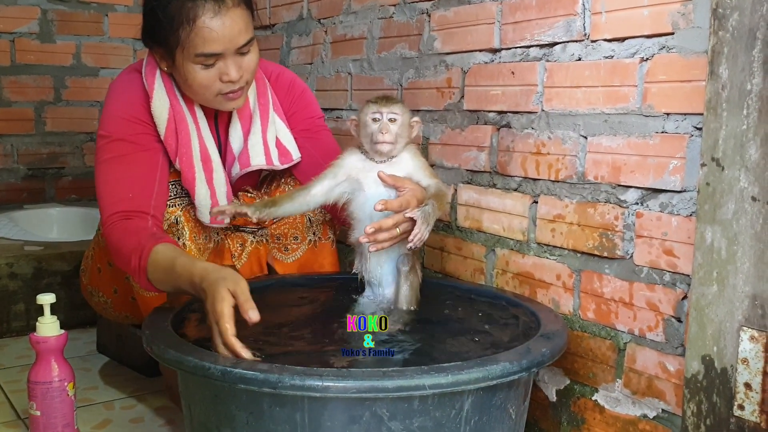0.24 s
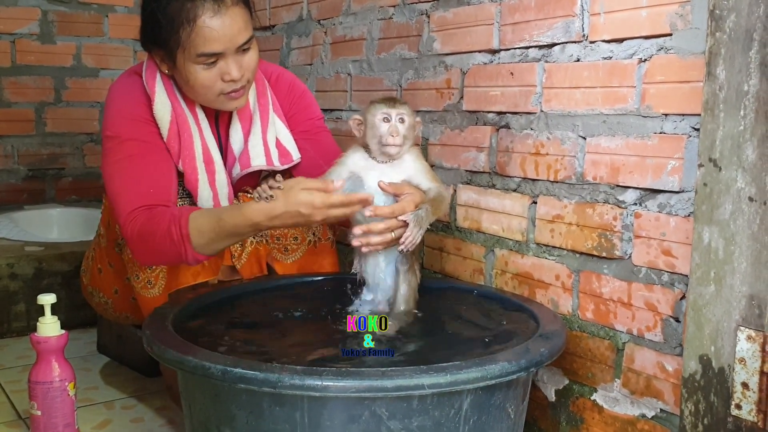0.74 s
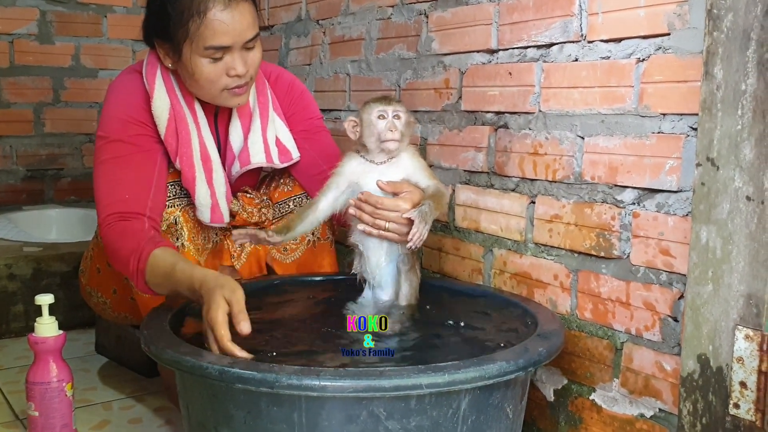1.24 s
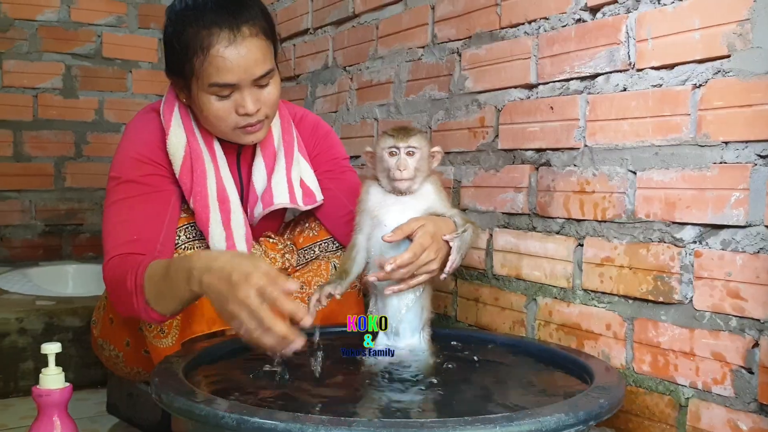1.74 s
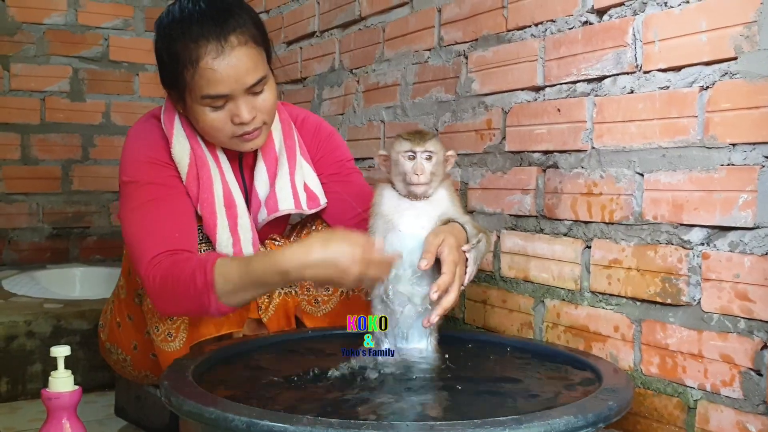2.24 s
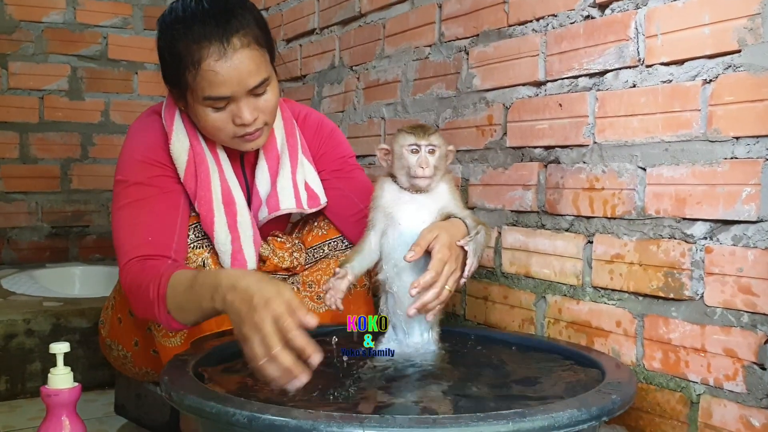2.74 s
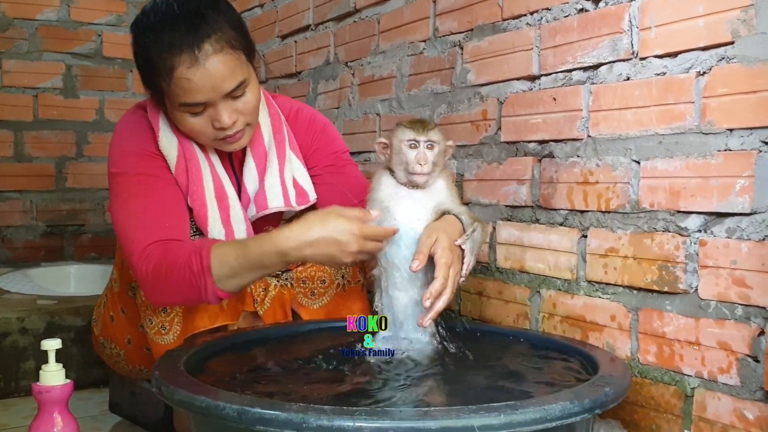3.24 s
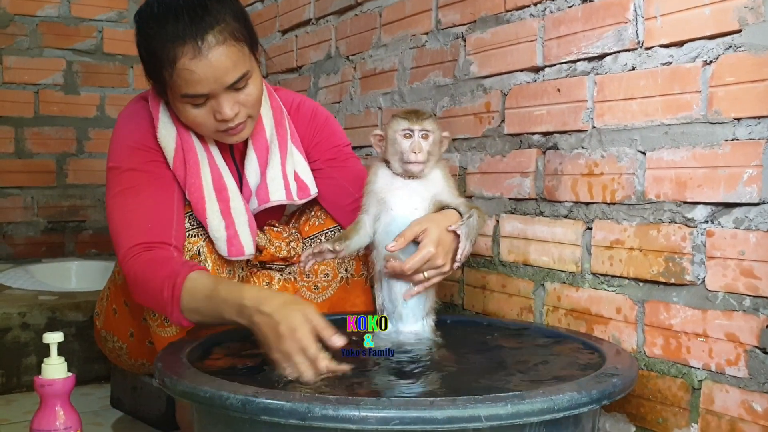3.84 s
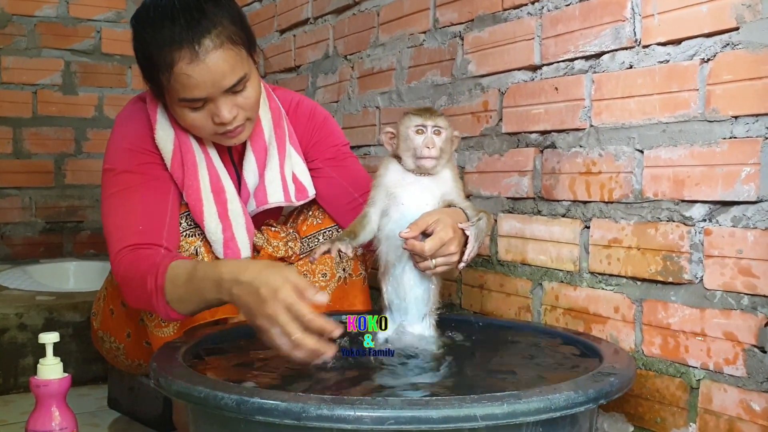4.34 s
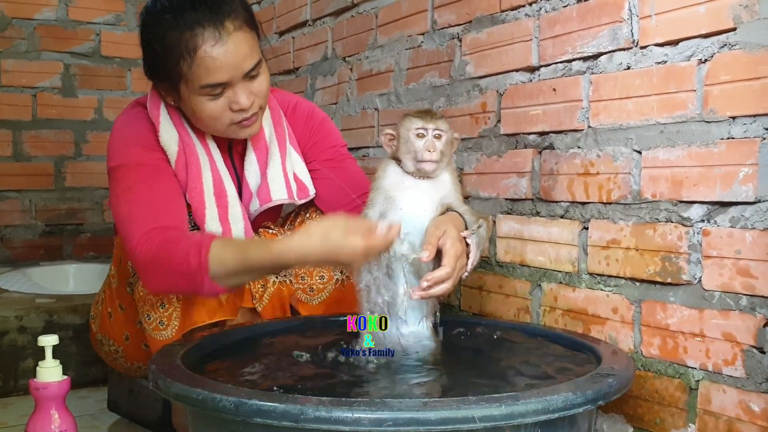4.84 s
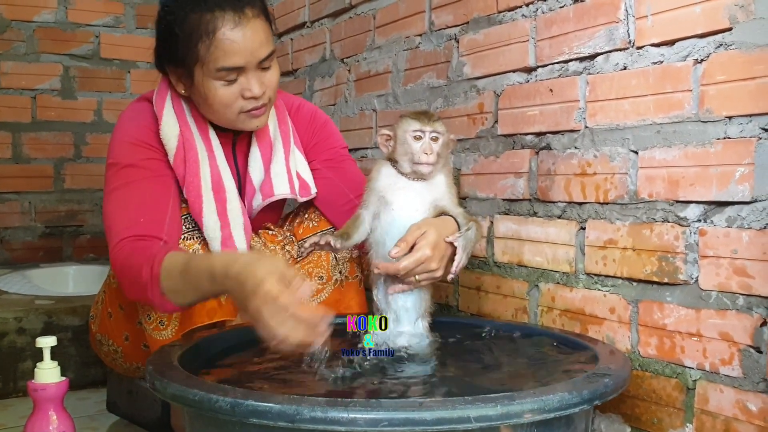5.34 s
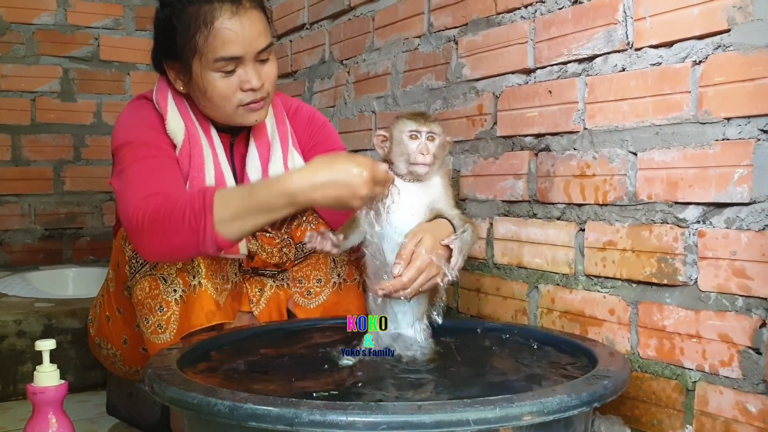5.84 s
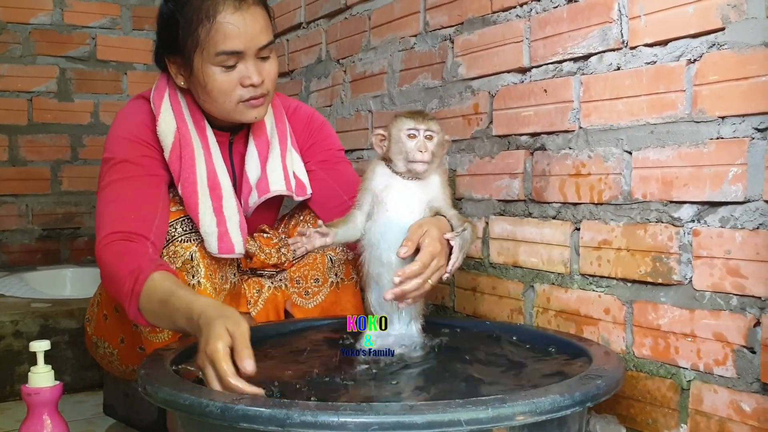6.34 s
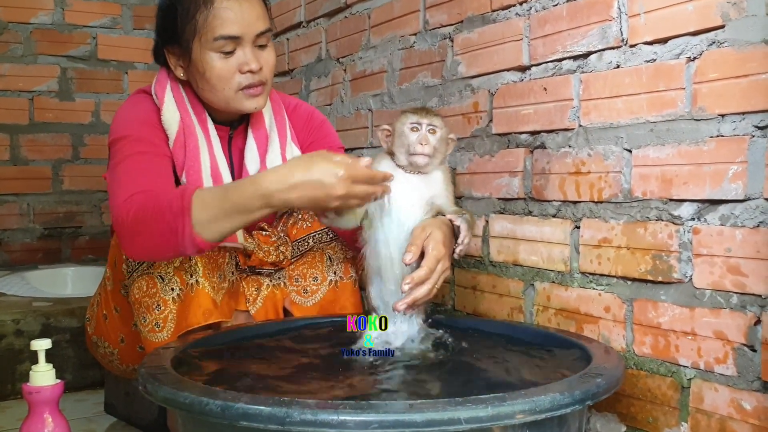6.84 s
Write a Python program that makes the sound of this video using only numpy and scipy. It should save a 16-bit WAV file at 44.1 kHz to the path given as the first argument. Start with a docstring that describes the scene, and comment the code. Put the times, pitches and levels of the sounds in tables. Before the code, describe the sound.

Close to the microphone, a hand repeatedly scoops water from a plastic tub and tosses it over a small animal. Quick wet slaps, bubbly upward swells, bright plips and clicks and tinkling run-off come irregularly, with brief lulls between. A hard brick corner adds a short, close echo. A very faint rising whistle opens it, over quiet air and low hum.

```python
"""A brick corner with a plastic tub close to the microphone: a hand scoops water over a small animal, repeatedly.
Scoops are swells of ringing bubbles; slaps are dense bursts of shorter ones; run-off is a random swarm
of bubbles, drops and fine spray. Single drops plip and click, and larger air pockets ring on.
The walls answer with decaying noise echoes. A faint rising whistle opens the scene; quiet air (noise),
low hums and drones (wavering sines) and rumble (dull noise) lie behind."""
import sys
import numpy as np
from scipy import signal
from scipy.fft import rfft, irfft, next_fast_len
from scipy.io import wavfile
from scipy.ndimage import map_coordinates

SR = 44100
rng = np.random.default_rng(int(sys.argv[2]) if len(sys.argv) > 2 else 0)


def bounce(signal):
    """Save signal as a 16-bit WAV file at the path given by the first command-line argument."""
    frames = np.transpose(np.atleast_2d(signal))
    limited = np.clip(frames, -1, 1)
    pcm = np.round(limited * 32767).astype(np.int16)
    wavfile.write(sys.argv[1], SR, pcm)


N = 313154  # length in samples

# Levels in the tables are settings before each layer's own trim; positive pan leans left.
# tone of the quiet air: [f/Hz, relative level/dB]
AIR_TONE = [(88, -55), (150, -5), (354, -15), (1560, -12.5), (2400, -9), (3220, -11), (3550, -17),
            (5680, -10), (8070, -16), (11300, -10), (14000, -17.5), (16000, -27)]
# tone of the rumble: [f/Hz, relative level/dB]
RUMBLE_TONE = [(20, -31), (32, -22), (42, -16), (60, 2.5), (82, -8.5), (112, -1), (150, -13.5), (200, -22),
               (400, -25), (1000, -54.5)]
# likeness of the two background channels: [f/Hz, correlation]
CHANNEL_LIKENESS = [(60, 0.82), (150, 0.87), (400, 0.72), (2000, 0.1), (10000, 0.097)]
# low wavering hum: [f/Hz, level/dB rms before its waver]
HUMS = [(61.5, -77), (114, -82)]
# dull low swells as the tub is jostled: [crest t/s, width/s, level/dB]
TUB_SWELLS = [(1.24, 0.094, -65.5), (2.418, 0.083, -66), (2.72, 0.11, -65.5), (3.95, 0.27, -62),
              (4.78, 0.066, -69.5), (5.11, 0.03, -58.5), (6.1, 0.4, -68), (7.03, 0.31, -65.5)]
# faint low drones: [t/s, length/s, f/Hz, held level/dB rms]
DRONE_TONES = [(0, 1.04, 169.3, -78.5), (2.38, 1.18, 231, -82.5), (5.294, 0.95, 117.4, -73.5)]
# decay of the tail between the brick walls: [f/Hz, t60/s]
WALL_DECAY = [(200, 0.61), (600, 0.29), (1000, 0.32), (3000, 0.28), (8000, 0.32), (15000, 0.26)]
# water spilling from the hand or off the animal into the tub:
# [t/s, length/s, gurgle level/dB, tinkle level/dB, patter level/dB, spray level/dB]
SPILL_EVENTS = [(0, 0.015, -62, -62.5, -57, -68), (0.2, 0.039, -50.5, -44.5, -47, -54),
                (0.466, 0.094, -54.5, -45, -48.5, -57), (0.639, 0.11, -76, -52, -49.5, -55),
                (0.877, 0.088, -48, -45, -43, -54), (1.449, 0.12, -68.5, -58.5, -59, -78),
                (1.608, 0.18, -70.5, -49, -53.5, -58.5), (1.848, 0.09, -69.5, -54, -51, -54.5),
                (2.04, 0.23, -78, -73, -67.5, -62), (2.334, 0.15, -93, -60, -59, -57),
                (2.554, 0.072, -54.5, -54.5, -52, -47), (2.973, 0.054, -95, -68.5, -64, -70),
                (3.06, 0.045, -55.5, -43, -51.5, -58), (3.214, 0.087, -71.5, -54.5, -51.5, -53),
                (3.446, 0.049, -57.5, -51.5, -54, -56), (4.005, 0.19, -56.5, -48, -50.5, -52.5),
                (4.268, 0.1, -61.5, -46.5, -49, -49), (4.495, 0.075, -96, -72.5, -78, -75),
                (4.59, 0.08, -73.5, -68, -63.5, -56.5), (4.7, 0.12, -61.5, -63.5, -61, -60.5),
                (4.82, 0.064, -64.5, -50, -51, -55), (4.982, 0.18, -60.5, -53, -46, -51),
                (5.214, 0.2, -70, -52.5, -55.5, -52.5), (5.671, 0.29, -59, -54, -60, -55.5),
                (5.95, 0.086, -59.5, -52, -51, -42.5), (6.132, 0.1, -65.5, -49.5, -49, -43.5),
                (6.494, 0.21, -78, -64, -63.5, -67.5), (6.758, 0.17, -69.5, -49.5, -51.5, -47),
                (7.009, 0.063, -54, -46.5, -43.5, -42.5)]
# release of a spill, small drops falling longest: [gurgle, tinkle, patter, spray time/s per 60 dB]
SPILL_RELEASE = [0.12, 0.16, 0.25, 0.3]
# the hand ploughs through the water and its bubbles shrink:
# [t/s, length/s, bubble level/dB, first f/Hz, last f/Hz]
SCOOP_EVENTS = [(0.403, 0.074, -39, 1163, 1880), (1.423, 0.11, -50.5, 1230, 1740),
                (2.102, 0.13, -41, 1520, 2950), (3.024, 0.081, -46, 1300, 2030),
                (3.84, 0.12, -61.5, 546, 1160), (3.942, 0.11, -41, 1246, 1690),
                (4.673, 0.07, -39.5, 1245, 1664), (4.972, 0.078, -49, 883, 1180),
                (5.596, 0.089, -55.5, 666, 1380), (5.73, 0.25, -64, 1700, 2700),
                (6.495, 0.094, -44.5, 793, 1470), (6.922, 0.16, -54, 553, 727)]
# large bubbles that ring on: [t/s, level/dB, f/Hz, t60/s]
GLUG_EVENTS = [(0.765, -44.5, 918, 0.082), (1.507, -26, 1220, 0.034), (2.597, -33, 659, 0.082),
               (4.175, -41, 972, 0.12), (6.535, -35.5, 896, 0.1)]
# drops that trap a small bubble: [t/s, level/dB, f/Hz, pan/dB]
PLIP_EVENTS = [(0.4281, -28.5, 2100, -6), (0.6668, -23, 3480, -1.5), (0.708, -30.5, 2516, -18.5),
               (0.7126, -31, 2740, 35), (0.8827, -19, 2176, -9), (0.9491, -29, 2140, -11),
               (1.461, -30.5, 1560, 5), (1.5792, -26.5, 5040, -3), (1.6596, -28, 3080, -4),
               (1.679, -28.5, 2440, -7), (1.727, -23.5, 4480, 0), (1.7897, -33, 1595, 3),
               (1.8562, -18, 6500, 0), (2.0192, -26, 7440, 7), (2.063, -37.5, 5370, -5),
               (2.157, -32, 3010, -4.5), (2.178, -30, 2310, -4), (2.2164, -38, 5120, -8),
               (2.362, -27, 2280, -7), (2.4348, -35, 2530, -11), (2.4396, -24.5, 3040, -4),
               (2.5677, -17, 5400, -2), (2.6694, -31, 2960, -6.5), (2.8607, -42.5, 3860, -3),
               (3.2066, -32.5, 1694, 1), (3.2962, -29.5, 2273, -4), (4.0128, -28, 1340, 0),
               (4.0546, -26, 2820, -2), (4.1884, -17.5, 5760, -1), (4.2622, -30, 3050, -8),
               (4.337, -33.5, 1256, 2), (4.473, -31.5, 6300, 2), (4.7194, -25.5, 5450, -3.5),
               (4.8082, -32, 2050, -3), (4.985, -26, 3740, 5), (5.1055, -27, 4870, -3),
               (5.1228, -30.5, 2450, -8.5), (5.224, -26.5, 3050, -4), (5.18, -37.5, 1053, -1),
               (5.24, -21, 4950, -4), (5.248, -36.5, 1350, -2), (5.3664, -28.5, 5800, -4),
               (5.7555, -31, 2610, -10.5), (5.778, -37, 1260, 3), (5.851, -38, 1540, 2),
               (5.9888, -28.5, 2980, -15), (6.095, -43, 1280, -18), (6.145, -26, 3740, -4),
               (6.1709, -30, 2015, 0), (6.2329, -22, 2670, -6.5), (6.234, -26, 2000, -6.5),
               (6.281, -36.5, 2860, -13), (6.2982, -33, 2940, -11), (6.3402, -37.5, 1776, -12.5),
               (6.799, -25, 2670, -7.5), (6.867, -34.5, 1086, 9)]
# drops that smack the surface or the rim: [t/s, level/dB]
TICK_EVENTS = [(0.7672, -34), (0.8145, -31), (0.8774, -25), (1.2994, -47), (1.6197, -22), (2.3025, -37),
               (2.3625, -14.5), (3.0999, -30), (3.2405, -25), (3.9509, -38), (4.1854, -31), (4.3146, -25),
               (4.4423, -31), (4.5002, -24), (4.6603, -26), (4.8419, -27), (4.9811, -21), (5.0554, -24),
               (5.2086, -26), (5.3308, -22), (5.4415, -32), (5.684, -23), (5.8426, -33), (5.9584, -24),
               (6.0931, -14), (6.1499, -24), (6.1684, -19.5), (6.1833, -21), (6.335, -30), (6.9187, -28),
               (7.0075, -22), (7.0718, -24)]
# handfuls that land: [t/s, level/dB, body level/dB re level, spray level/dB re level, t60/s]
SLAP_EVENTS = [(0.2, -39.5, 6, -23, 0.33), (0.214, -25.5, -33, -23.5, 0.047),
               (0.472, -28.5, 0.5, -19, 0.076), (0.482, -20.5, 5, -49, 0.026), (0.884, -23, -5, -18, 0.041),
               (0.899, -62, -16, -17, 0.098), (0.951, -19.5, -14, -18.5, 0.022),
               (2.564, -38, -19, -31, 0.14), (3.068, -39, -20, -56, 0.6), (3.241, -23.5, -28, -25, 0.017),
               (3.467, -24.5, -15.5, -20.5, 0.095), (4.316, -19, -38, -22, 0.06),
               (4.811, -44, -4, -40, 0.19), (5.054, -23.5, -35, -17.5, 0.04),
               (5.956, -19, -17.5, -21, 0.075), (6.964, -21.5, -36, -21.5, 0.041),
               (7.01, -12.5, -22, -37.5, 0.022)]
# filters that shade the bubble swarms, each: [f/Hz, relative gain/dB]
GURGLE_TONE = [(200, -1.5), (400, -21.5), (600, -8), (950, 5.5), (1350, 10), (1700, 12), (2600, -63)]
TINKLE_TONE = [(1000, -9), (1400, -8.5), (1800, 2), (2300, 8), (2900, 10.5), (3400, 15), (4200, -36)]
PATTER_TONE = [(2600, -28), (3500, -6), (4300, -0.5), (5600, 3.5), (7000, 0), (9000, 4), (12000, -10)]
SPRAY_TONE = [(4000, -16), (7000, -10.5), (8500, -22.5), (10000, -5.5), (11400, -2), (13000, -5.5),
              (15800, -16.5)]
SPLASH_TONE = [(700, -35), (1100, -20.5), (1800, -18), (2400, 12), (3500, 19), (5600, 16.5), (7500, 20.5),
               (11000, 8)]
# hollows in the microphone's response: [centre f/Hz, width/Hz, level/dB]
MIC_HOLLOWS = [(3303, 255, -6.5), (8240, 700, -4)]

MIC_TOP_HZ = 16100
PORT_LAG = 2.77  # typical lag of the right port behind the left, samples
RUMBLE_DB = -76  # steady rumble of the surroundings
HUM_WAVER_DB = 4
WHISTLE_S, WHISTLE_LENGTH_S = 0.025, 0.22
WHISTLE_DB, WHISTLE_FADE_DB_PER_S = -61.5, 39  # level at the start, then its fade
WHISTLE_HZ, WHISTLE_HZ_PER_S = 1540, 580
SPILL_LEAD = 0.96  # swell before a spill: time per 60 dB, as a share of its length
SPILL_SAG_DB_PER_S = 4.5  # the flow weakens as the water runs out
CLUMP_DB, CLUMPS_PER_S = 1.0, 40  # water falls in uneven clumps
TRICKLE_DB = -74.5  # fine spray that never quite stops
SCOOP_CYCLES, SCOOP_OCTAVES = 23.9, 1.466  # mean t60 in cycles; full scatter of pitch


def amp(db):
    """Decibels to gain."""
    return 10 ** (np.asarray(db) / 20)


def unit(x):
    """Scaled to rms 1."""
    return x / np.sqrt(np.mean(x ** 2) + 1e-20)


def decay(age, t60):
    """Exponential fall of 60 dB in t60."""
    return np.exp(-np.log(1000) * age / t60)


def along(points, hz):
    """Values at f/Hz, read between points on a log axis."""
    f, value = np.transpose(points)
    return np.interp(np.log(hz + 1), np.log(f + 1), value)


def wobble(rate):
    """A smooth random curve, rate knots a second."""
    knots = rng.standard_normal(int(N * rate / SR) + 4)
    return map_coordinates(knots, [np.arange(N) * rate / SR])


def filtered(x, response):
    """x times a response of frequency."""
    m = next_fast_len(N + SR // 4)
    hz = np.fft.rfftfreq(m, 1 / SR)
    return irfft(rfft(x, m) * response(hz), m)[..., :N]


def coloured(x, tone):
    """x shaded by a tone table, at rms 1."""
    return unit(filtered(x, lambda hz: amp(along(tone, hz))))


def gate(s, length, attack_s, release_s):
    """Rises from s, holds until s + length, then dies by 60 dB in release_s."""
    age = np.arange(N) / SR - s
    return np.clip(age / attack_s, 0, 1) * amp(-60 * np.maximum(age - length, 0) / release_s)


def background():
    """Quiet air, an uneven rumble and a wavering low hum, slightly stronger on the right."""
    def noise(tone):
        """Stereo noise, most alike between channels in the bass."""
        def mid_side(hz):
            # mid and side shares that give the wanted correlation
            angle = np.arccos(np.clip(along(CHANNEL_LIKENESS, hz), -1, 1)) / 2
            return np.array([np.cos(angle), np.sin(angle)])

        mid, side = filtered(rng.standard_normal((2, N)), mid_side)
        return coloured(np.array([mid + side, mid - side]), tone)

    t = np.arange(N) / SR
    swell = sum(amp(db) * np.exp(-((t - s) / width) ** 2) for s, width, db in TUB_SWELLS)
    steady = amp(RUMBLE_DB + 0.5 * wobble(2.9))
    rumble = np.hypot(steady, swell) * noise(RUMBLE_TONE)
    hum = np.zeros(N)
    for hz, db in HUMS:
        level = amp(db + HUM_WAVER_DB * wobble(7.2))
        hum += level * unit(np.sin(2 * np.pi * hz * t + wobble(31)))
    return (amp(-68) * noise(AIR_TONE) + rumble + hum) * amp([[-1.2], [1.2]])


def drones():
    """Low sines with wavering phase that fade in and out."""
    t, out = np.arange(N) / SR, np.zeros(N)
    for s, length, hz, db in DRONE_TONES:
        tone = unit(np.sin(2 * np.pi * hz * t + 0.24 * wobble(18)))
        out += amp(db) * gate(s, length, attack_s=0.15, release_s=1.0) * tone
    return out


def whistle():
    """A short thin tone, unsteady in pitch, that creeps upward as it fades."""
    age = np.maximum(np.arange(N) / SR - WHISTLE_S, 0)
    pitch = (WHISTLE_HZ + WHISTLE_HZ_PER_S * age) * (1 + 0.017 * wobble(150))
    level = amp(WHISTLE_DB - WHISTLE_FADE_DB_PER_S * age + 3.2 * wobble(67))
    tone = np.sin(2 * np.pi * np.cumsum(pitch) / SR)
    return level * gate(WHISTLE_S, WHISTLE_LENGTH_S, attack_s=0.012, release_s=0.1) * tone


def walls(x, near_db, tail_db, count=36):
    """Close brick walls return echoes and a short tail; the pattern changes gradually, so no pitch rings out."""
    hz, t, z = signal.stft(rng.standard_normal((count, 2, SR // 3)), SR, nperseg=256)
    late = amp(tail_db) * decay(t, along(WALL_DECAY, hz)[:, None])
    early = amp(near_db) * np.exp(-t / 0.0048)
    onset = 1 - np.exp(-t / 0.00056)
    answers = signal.istft(z * (early + late) * onset, SR, nperseg=256)[1]
    x = x + 0.11 * x[::-1]  # echoes also cross sides
    hop = N // (count - 1) + 1
    padded = np.pad(x, ((0, 0), (hop, 2 * hop)))
    out = np.zeros((2, N + 2 * SR))
    # overlapping windows pass from one echo pattern to the next
    for k, answer in enumerate(answers):
        piece = padded[:, k * hop:(k + 2) * hop] * signal.windows.cosine(2 * hop)
        echo = signal.fftconvolve(piece, answer, axes=1)
        out[:, k * hop:k * hop + echo.shape[1]] += echo
    return out[:, hop:hop + N]


def bubbles(s, hz, db, t60, pan_db, rise, onset_cycles):
    """Damped sines at two microphone ports; a positive rise lifts the pitch as a bubble nears the surface."""
    length = np.ceil(t60 * SR).astype(int) + 8
    who = np.repeat(np.arange(len(s)), length)  # bubble that owns each sample
    step = np.arange(len(who)) - np.repeat(np.cumsum(length) - length, length)
    at = np.clip(np.round(s * SR).astype(int), 0, N)[who] + step
    lag = np.abs(rng.normal(PORT_LAG, 1.0, len(s)))
    out = []
    # left, then right: share of the pan and delay in samples
    for side, delay in ((0.43, 0.078), (-1.7, lag[who])):
        t = np.maximum(step - delay, 0) / SR
        age = np.float32(t / t60[who])
        turns = np.float32(t * hz[who])
        swell = 1 - np.exp(-turns / onset_cycles)
        ring = np.sin(2 * np.pi * turns * (1 + rise * age)) * swell * decay(age, 1)
        level = amp(db + side * pan_db / 2)[who]
        out.append(np.bincount(at, ring * level, N)[:N])
    return np.array(out)


def swarm(tone, low_hz, high_hz, cycles, spread_db, pan_db, count):
    """Countless bubbles of random time, size, strength and place, at rms 1."""
    when, size, strength, life, place = rng.random((count, 5)).T
    hz = low_hz * (high_hz / low_hz) ** size
    db = -spread_db * np.log(strength + 0.028)  # a few stand out
    t60 = cycles * 2 ** (2 * life - 1) / hz
    pan = pan_db + 10 * (place - .5)
    cloud = bubbles(when * N / SR, hz, db, t60, pan, rise=0.11, onset_cycles=cycles / 12)
    return coloured(cloud, tone)


def spill_flow():
    """Strength of gurgle, tinkle, patter and spray: each spill swells, sags and dies away in clumps."""
    t, flow = np.arange(N) / SR, np.zeros((4, N))
    release_s = np.array(SPILL_RELEASE)[:, None]
    for s, length, *levels_db in SPILL_EVENTS:
        near = (t > s - length) & (t < s + length + .5)
        age = t[near] - s
        swell_db = 60 * np.minimum(age, 0) / (SPILL_LEAD * length)
        sag_db = -SPILL_SAG_DB_PER_S * (age - length / 2)
        release_db = -60 * np.maximum(age - length, 0) / release_s
        level = amp(np.array(levels_db)[:, None] + swell_db + sag_db + release_db)
        flow[:, near] = np.hypot(flow[:, near], level)
    shared = wobble(CLUMPS_PER_S)
    return [layer * amp(CLUMP_DB * (shared + wobble(CLUMPS_PER_S))) for layer in flow]


def spills():
    """Large bubbles gurgle under falling water, smaller ones tinkle in run-off, drops patter, spray fizzes."""
    gurgle_flow, tinkle_flow, patter_flow, spray_flow = spill_flow()
    gurgle = swarm(GURGLE_TONE, 343.3, 1703, cycles=16.4, spread_db=6.0, pan_db=2.0, count=3800)
    tinkle = swarm(TINKLE_TONE, 1370, 3350, cycles=23.0, spread_db=4.0, pan_db=-7, count=5000)
    patter = swarm(PATTER_TONE, 3326, 8630, cycles=25.0, spread_db=5.5, pan_db=-1.0, count=10000)
    spray = swarm(SPRAY_TONE, 7030, 16040, cycles=23.0, spread_db=6.5, pan_db=-4.0, count=22000)
    out = gurgle_flow * gurgle + tinkle_flow * tinkle + patter_flow * patter
    return out + (spray_flow + amp(TRICKLE_DB)) * spray


def plips():
    """Single drops: a tiny impact, then a brief ringing bubble beside a larger and a smaller one."""
    s, db, hz, pan_db = np.transpose(PLIP_EVENTS)
    out = bubbles(s, hz, db + 4.0, 30 / hz, pan_db, rise=0.034, onset_cycles=2.43)
    out += bubbles(s, 2 * hz, db - 12.5, 3 / hz, pan_db, rise=0, onset_cycles=0.37)  # impact
    for side in (-1, 1):  # larger, then smaller neighbour
        late, size = rng.random((len(s), 2)).T
        other_hz = hz * 2 ** (side * (0.17 + 0.19 * size))
        out += bubbles(s + .004 * late, other_hz, db - 10.0, 22 / other_hz, pan_db, rise=0.19, onset_cycles=1)
    return out


def ticks(count=12):
    """A smacking drop gives one sharp click and shatters into a few weaker ones."""
    s, db = np.repeat(TICK_EVENTS, count, axis=0).T
    late, size = rng.random((len(s), 2)).T
    rank = np.tile(np.arange(count), len(TICK_EVENTS)) / count
    hz = 11000 * 2 ** ((size - .5) * (0.068 + 1.2 * rank))
    db = db + 8.5 - 16 * np.sqrt(rank)
    when = s + 0.0027 * rank * (.5 + late)
    return bubbles(when, hz, db, 12 / hz, pan_db=-4.0, rise=0.051, onset_cycles=1.0)


def glugs():
    """Air pockets left by the hand ring low and long; a smaller pocket beside each roughens the ring."""
    s, db, hz, t60 = np.transpose(GLUG_EVENTS)
    pocket = bubbles(s, hz, db - 1.0, t60, pan_db=-5.5, rise=0.013, onset_cycles=8.4)
    smaller = bubbles(s + 0.0029, 1.2 * hz, db - 11, 0.62 * t60, pan_db=8, rise=0.055, onset_cycles=2.4)
    return pocket + smaller


def scoops(count=90):
    """A swell of bubbles whose pitch climbs as the cupped hand rises."""
    out = np.zeros((2, N))
    for s, length, db, first_hz, last_hz in SCOOP_EVENTS:
        phase, size, life = rng.random((count, 3)).T
        climb_hz = first_hz * (last_hz / first_hz) ** phase
        hz = climb_hz * 2 ** (SCOOP_OCTAVES * (size - .5))
        swell_db = 20 * np.log10(np.sin(np.pi * phase) + 0.057)
        t60 = SCOOP_CYCLES * (.5 + life) / hz
        out += bubbles(s + length * phase, hz, db + swell_db, t60, pan_db=0.0, rise=0.049, onset_cycles=2.07)
    return out


def slaps():
    """A handful breaks on the water in a dense burst of short-lived bubbles."""
    force, t = np.zeros((3, N)), np.arange(N) / SR
    for s, db, body_db, spray_db, t60 in SLAP_EVENTS:
        age = np.maximum(t - s, 0)
        impact = 1 + 1.1 * np.exp(-age / 0.003)  # first contact is the hardest
        burst = (1 - np.exp(-age / 0.00034)) * impact * decay(age, t60)
        force += amp(db + np.array([body_db, 0, spray_db]))[:, None] * burst
    body_force, splash_force, spray_force = force
    body = swarm(GURGLE_TONE, 468, 2150, cycles=19.0, spread_db=1, pan_db=-1.5, count=9000)
    splash = swarm(SPLASH_TONE, 1008, 10370, cycles=11, spread_db=6.0, pan_db=0.5, count=45000)
    spray = swarm(SPRAY_TONE, 6000, 15500, cycles=6, spread_db=2.5, pan_db=-5, count=40000)
    return amp(-13) * body_force * body + amp(-10.5) * splash_force * splash + amp(6) * spray_force * spray


def scene():
    """All the water in its brick corner over the background; small drops radiate almost no bass."""
    drops = filtered(plips() + ticks(), lambda hz: (1j * hz / (700 + 1j * hz)) ** 3)
    water = spills() + drops + glugs() + scoops() + slaps()
    corner = water + walls(water, near_db=-29.0, tail_db=-33.0)
    return background() + drones() + whistle() + corner


def record(dry):
    """The microphone ports hollow out two bands; nothing passes above the band limit."""
    def response(hz):
        hollow_db = sum(db * np.exp(-((hz - centre) / width) ** 2) for centre, width, db in MIC_HOLLOWS)
        return amp(hollow_db) * (hz < MIC_TOP_HZ)

    return filtered(dry, response)


dry = scene()
out = record(dry)
bounce(out)
```